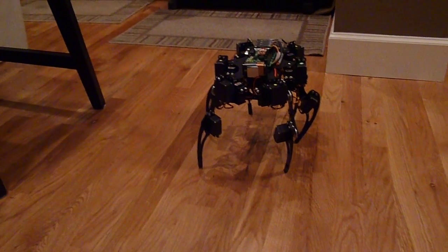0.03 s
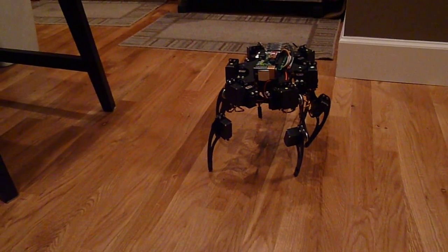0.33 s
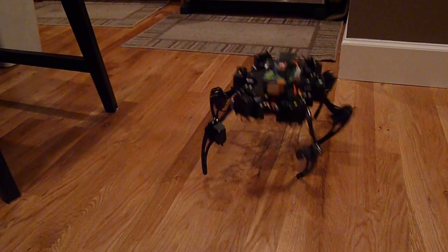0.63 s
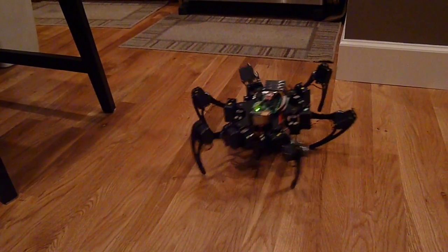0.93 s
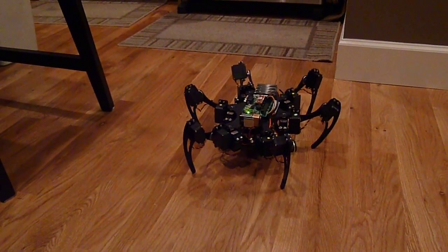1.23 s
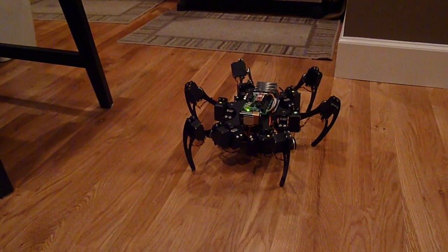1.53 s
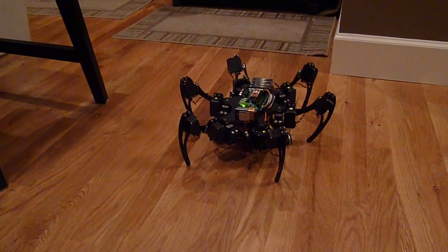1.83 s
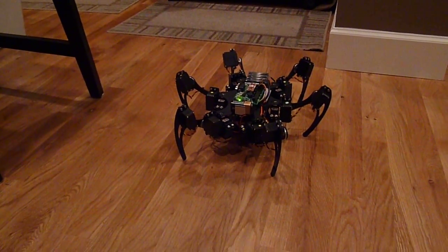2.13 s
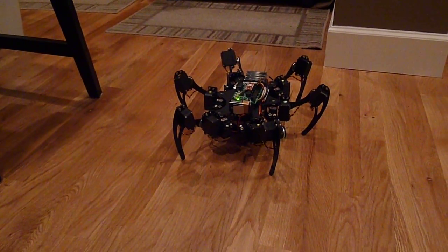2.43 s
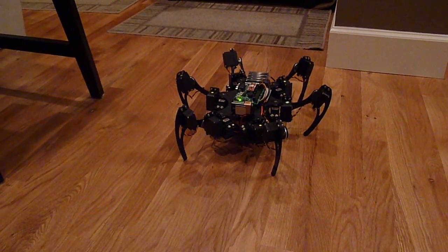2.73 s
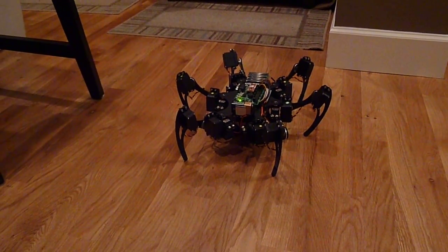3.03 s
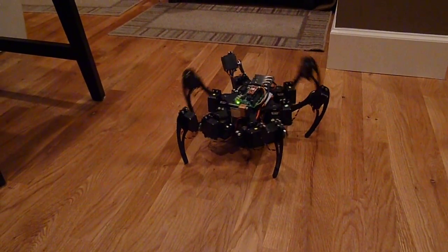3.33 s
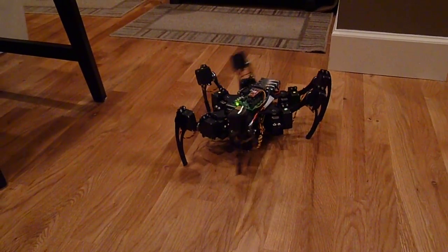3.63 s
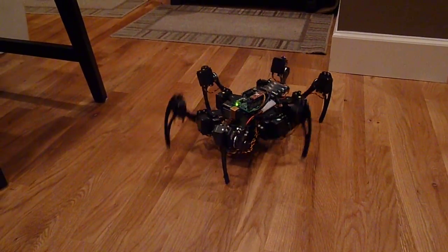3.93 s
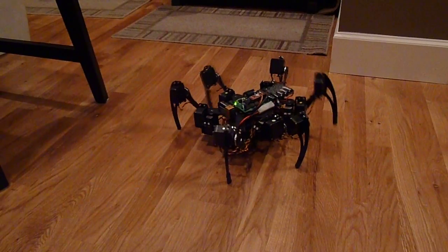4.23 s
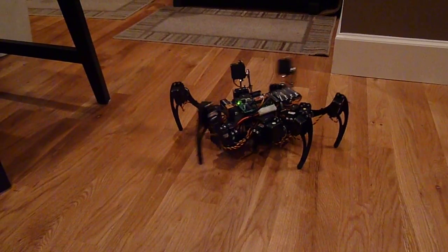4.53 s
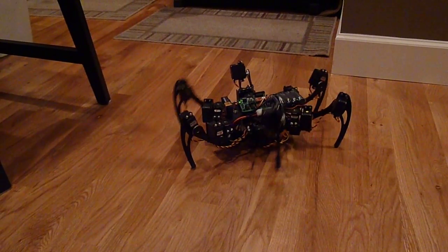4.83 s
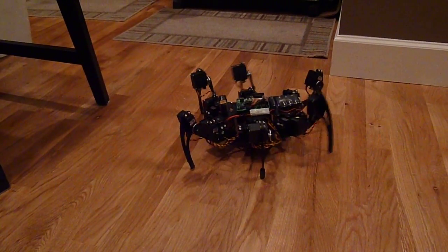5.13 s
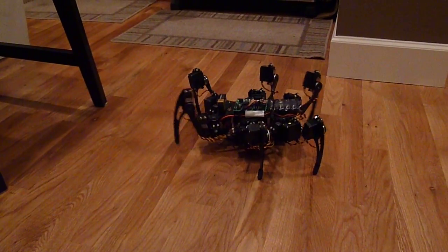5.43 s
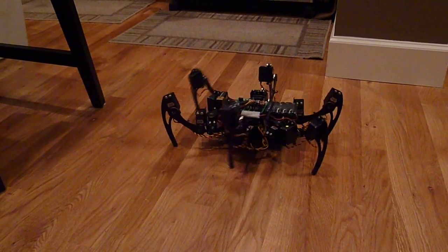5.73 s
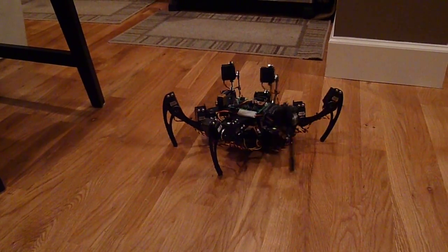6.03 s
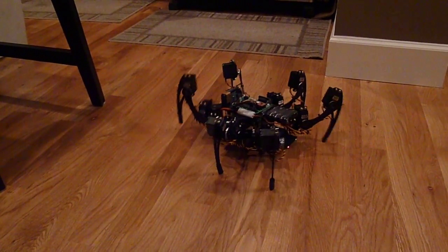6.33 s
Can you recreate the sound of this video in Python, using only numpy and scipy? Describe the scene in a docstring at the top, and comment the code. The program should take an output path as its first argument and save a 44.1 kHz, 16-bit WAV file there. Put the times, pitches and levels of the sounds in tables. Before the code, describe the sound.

A soft room rumble and the faint buzz of a six-legged robot's servos run throughout, heard from nearby with light indoor echo. At the very start there is thin ticking and a brief, soft hollow ring. At about 0.5 seconds the robot crouches: a loud burst of gear rattle with high whines that glide up and down, and dull thumps of feet on wooden boards, dying away by 1.3 seconds. It then stands buzzing quietly, with faint ticking from about 1.5 seconds. Just after 3 seconds it starts walking. Each leg swing is a short, bright burst of rattle and whine, about seven a second, over continuous gear noise and soft, low footfalls on the floor. A leg joint snaps once near 3.9 seconds. The walking continues to the end, at about 6.4 seconds.

```python
"""A six-legged robot stands on a wooden floor in a softly rumbling living room. Its servos, driven by
fifty pulses a second, buzz and tick under its weight, and something hollow rings briefly. It drops into
a crouch: gear teeth rattle the cases and frame, loaded gears whine and the feet thump on the boards.
It stands buzzing for about two seconds, then walks, each leg swing a burst of rattle and whine among
the footfalls. Early in the walk a leg joint snaps once."""
import sys
import numpy as np
from scipy import signal
from scipy.fft import rfft, irfft, next_fast_len
from scipy.io import wavfile
from scipy.ndimage import uniform_filter1d

SR = 44100
rng = np.random.default_rng(int(sys.argv[2]) if len(sys.argv) > 2 else 0)


def wrap_up_sound(samples):
    """Save the sound to the file named by the first command line argument, as 16-bit audio."""
    columns = np.atleast_2d(samples).T
    # keep every value between -1 and 1, then stretch to whole-number steps
    tamed = np.clip(columns, -1, 1)
    steps = np.round(tamed * 32767).astype(np.int16)
    wavfile.write(sys.argv[1], SR, steps)


N = 281799
T = np.arange(N) / SR
DRIVE_HZ = 50   # servo drive pulses


def from_db(db):
    """Amplitude ratio of a level in decibels."""
    return 10 ** (np.asarray(db) / 20)


def unit_rms(x):
    """Normalisation to unit power."""
    return x / np.sqrt(np.mean(x ** 2) + 1e-20)


def coloured(x, spectrum):
    """Spectral shaping by rows (f/Hz, level/dB), falling 100 dB per octave past the ends; unit rms."""
    hz, db = np.transpose(spectrum)
    size = next_fast_len(N)
    octave = np.log2(np.maximum(np.fft.rfftfreq(size, 1 / SR), 1))
    outside = np.abs(octave - np.clip(octave, np.log2(hz[0]), np.log2(hz[-1])))
    gain = from_db(np.interp(octave, np.log2(hz), db) - 100 * outside)
    return unit_rms(irfft(rfft(x, size) * gain, size)[:N])


def drift(cutoff_hz, size=N):
    """Random fluctuation: low-passed Gaussian noise of about unit rms."""
    r = np.exp(-2 * np.pi * cutoff_hz / SR)
    smooth = signal.lfilter([1], [1, -2 * r, r * r], rng.standard_normal(size + SR))
    return unit_rms(smooth[SR // 2:])[-size:]


def resonance(x, hz, width_hz):
    """Forced response of a damped oscillator, with unit gain at its peak."""
    r = np.exp(-np.pi * width_hz / SR)
    feedback = [1, -2 * r * np.cos(2 * np.pi * hz / SR), r * r]
    return signal.lfilter(np.array([1, 0, -1]) * (1 - r * r) / 2, feedback, x + 1e-18)


def struck(blows, modes, scatter_db):
    """Modal ringing after blows (t/s, level/dB, f/Hz); a soft contact barely excites modes above its f."""
    at, level_db, contact_hz = np.transpose(blows)
    out = np.zeros(N)
    for k, (hz, mode_db, t60) in enumerate(modes):
        force = from_db(level_db + mode_db + scatter_db * rng.standard_normal(len(at)))
        impulses = np.full(N, 1e-18)
        impulses[(at * SR).astype(int)] = force / np.hypot(1, (hz / contact_hz) ** 2)
        r, w = from_db(-60 / (t60 * SR)), 2 * np.pi * hz / SR
        out += (-1) ** k * signal.lfilter([0, np.sin(w)], [1, -2 * r * np.cos(w), r * r], impulses)
    return out


# room rumble and hiss: f/Hz, relative spectral level/dB
RUMBLE_SPECTRUM = [(25, -25), (40, -18), (62, -5), (95, -5.5), (150, -9), (205, -3), (290, -7), (350, -8.5),
                   (480, -9.5), (850, -17), (1300, -14), (2200, -24.5), (5000, -29.5), (7600, -33),
                   (8400, -50.5)]
# room hums: f/Hz, waver rate/Hz, level/dB, wavering share of the amplitude
ROOM_HUMS = [(50.6, 1.5, -55.5, 0.62), (214.5, 7.6, -55.5, .9), (241.5, 6.8, -60.5, 0.96),
             (286.7, 15, -59, 0.95), (464, 9, -64, 0.87), (956, 1.7, -69.5, 0.76)]
def room_rumble():
    """Broadband noise plus hums, each a steady tone that wavers by interference with narrowband noise."""
    out = from_db(-49) * coloured(rng.standard_normal(N), RUMBLE_SPECTRUM)
    for hz, waver_hz, db, share in ROOM_HUMS:
        steady = np.sqrt(2 * (1 - share ** 2))
        wavering = share * (drift(waver_hz) + 1j * drift(waver_hz))
        out += from_db(db) * ((steady + wavering) * np.exp(2j * np.pi * hz * T)).real
    return out


# resonances of the servos holding the weight: f/Hz, bandwidth/Hz, relative level/dB
HOLDING_RESONANCES = [(458, 105, -5.5), (756, 110, -4.5), (1118, 195, -3.5), (1395, 164, -7.5)]
def holding_buzz(level_db=-56, scatter_db=4, jitter_s=.00023, hunting_db=3, servos=10):
    """Periodic impulse excitation: each servo is kicked once a drive period; gear play adds jitter."""
    kicks = np.zeros(N)
    for slot in (np.arange(servos) + rng.random(servos)) / servos:
        times = np.arange(slot / DRIVE_HZ, T[-1], 1 / DRIVE_HZ)
        times += jitter_s * rng.standard_normal(len(times))
        at = np.clip(times * SR, 0, N - 1).astype(int)
        kicks[at] += from_db(scatter_db * (rng.standard_normal() + rng.standard_normal(len(at))))
    buzz = sum((-1) ** k * from_db(db) * resonance(kicks, hz, width)
               for k, (hz, width, db) in enumerate(HOLDING_RESONANCES))
    hunting = from_db(hunting_db * drift(15))   # the servos hunt around their set angles
    return from_db(level_db) * unit_rms(buzz * hunting)


def soften_top(x):
    """Low-pass: whines and ticks fade out above 7.4 kHz."""
    return signal.sosfilt(signal.cheby1(10, .5, 7400, fs=SR, output="sos"), x)


# a servo ticking against its load: start t/s, end t/s, f/Hz, bandwidth/Hz, level/dB
STRAIN_SPELLS = [(0.01, 0.47, 5050, 650, -67), (0.01, 0.47, 2300, 300, -71),
                 (1.555, 3.09, 3740, 220, -70.5), (3.099, 3.14, 4440, 2220, -50)]
def strain_ticks(decay_s=.006):
    """Resonant filtering: each drive pulse nudges a motor against its gears; the scratch rings a shell."""
    out = np.zeros(N)
    for start, end, hz, width, db in STRAIN_SPELLS:
        since_pulse = (T - start) % (1 / DRIVE_HZ)
        scratches = rng.standard_normal(N) * np.exp(-since_pulse / decay_s)
        ticks = unit_rms(resonance(resonance(scratches, hz, width), hz, width * 2))
        out += from_db(db) * ticks * ((T > start) & (T < end))
    return soften_top(out)


# soft knocks: t/s, relative level/dB
KNOCKS = [(0.051, -42.5), (0.072, -39.5), (0.118, -40)]
# modes of the hollow body: f/Hz, relative level/dB, T60/s
HOLLOW_MODES = [(276.7, 1, 0.38), (297.3, -5, 0.66), (390, -7, .2), (450, -2, 0.18), (611, -1.5, 0.083),
                (676, -9.5, .4), (709.5, -0.5, 0.32)]
def hollow_ring(contact_hz=1200):
    """Free vibration: something hollow rings on after soft knocks."""
    return from_db(.5) * struck([(t, db, contact_hz) for t, db in KNOCKS], HOLLOW_MODES, scatter_db=1)


def tooth_clicks(per_s, spread_db=2):
    """Poisson impacts: gear teeth clack through their backlash, a few much harder than the rest."""
    sizes = from_db(spread_db * np.minimum(rng.exponential(1, N), 4)) * rng.choice([-1, 1], N)
    return sizes * (rng.random(N) < per_s / SR)


def motor_pulses(effort_db, tooth_hz, speed_exponent, wander=.045, jitter=.008, load_db=7):
    """Harmonic series: four motors pulse once per gear tooth, turning faster with effort; unit rms."""
    speed = from_db(speed_exponent * uniform_filter1d(effort_db - effort_db.max(), size=2000))
    out = np.zeros(N)
    for ratio in np.linspace(.8, 1.2, 4):
        hz = tooth_hz * ratio * speed * (1 + wander * drift(4) + jitter * drift(196.4))
        cycles = np.cumsum(hz) / SR
        motor = sum(np.cos(2 * np.pi * (harmonic * cycles + offset))
                    for harmonic, offset in enumerate(rng.random(11), 1))
        out += motor * from_db(load_db * drift(7.5))   # the load passes from one motor to another
    return out / np.sqrt(uniform_filter1d(out ** 2, size=1500) + 1e-9)


# narrow resonances of the gearbox shells: f/Hz, bandwidth/Hz, gain/dB
SHELL_RESONANCES = [(2705, 110, -4), (3190, 110, -4.5), (3895, 64, -6), (4910, 36, -3.5), (5780, 120, -7),
                    (6680, 220, -7.5), (7950, 140, -12.5), (8010, 170, 0)]
def gear_rattle(motion, gear_spectrum, frame_spectrum, clicks_per_s, tooth_hz, speed_exponent, motor_db,
                pulse_depth, spurt_depth, gear_trim_db, treble_trim_db, frame_trim_db):
    """Forced vibration: motors and loose teeth shake gearboxes and frame, surging on each drive pulse."""
    times, *levels = np.transpose(motion)
    rattle_db, treble_db, frame_db = [np.interp(T, times, level) for level in levels]
    running = uniform_filter1d(1. * ((T > times[0]) & (T < times[-1])), size=200)
    drive_pulse = np.cos(2 * np.pi * DRIVE_HZ * T + .4 * drift(1.6))
    force = unit_rms(tooth_clicks(clicks_per_s))
    force += from_db(motor_db) * motor_pulses(rattle_db, tooth_hz, speed_exponent)
    ringing = sum(from_db(db) * resonance(force, hz, width) for hz, width, db in SHELL_RESONANCES)
    rattle = coloured(force + ringing, gear_spectrum)
    treble, top = [signal.sosfiltfilt(signal.butter(3, hz, "high", fs=SR, output="sos"), rattle)
                   for hz in (5600, 7300)]
    # the highest treble flickers and surges with each drive pulse
    spurts = spurt_depth * (drive_pulse + 1.6 * drift(130))
    rattle = rattle - treble + from_db(treble_db + treble_trim_db) * (treble + top * spurts)
    gearboxes = from_db(rattle_db + gear_trim_db) * rattle
    frame = from_db(frame_db + frame_trim_db) * coloured(tooth_clicks(per_s=4000), frame_spectrum)
    return running * (1 + pulse_depth * drive_pulse) * (gearboxes + frame)


# the drop, before trims: t/s, rattle level/dB, treble level re rattle/dB, frame level/dB
CROUCH_MOTION = [(0.47, -61, -4, -69), (0.517, -35.5, -13.5, -56), (0.602, -32.5, -1, -49.5),
                 (0.77, -32, -3, -40), (0.862, -33.5, -5.5, -42), (0.95, -40.5, -16, -48),
                 (1.08, -45, -11.5, -52), (1.16, -53.5, -20, -66), (1.27, -68, -7.5, -65)]
# gearbox and frame responses in the crouch: f/Hz, relative spectral level/dB
CROUCH_GEAR_SPECTRUM = [(880, -52), (1500, -30), (1700, -5), (2610, -12), (3010, -4.5), (3240, -6),
                        (3710, -2.5), (5640, 1.5), (6130, -2), (6810, 0), (7850, -11), (8330, -17),
                        (8980, -38), (11700, -82), (19800, -120)]
CROUCH_FRAME_SPECTRUM = [(150, 3.5), (300, -2.5), (600, -2.5), (900, -2), (1400, -1), (1900, -7.5),
                         (2600, -10), (4000, -37)]
def crouch_rattle():
    """Structure-borne sound of all legs folding at once."""
    return gear_rattle(CROUCH_MOTION, CROUCH_GEAR_SPECTRUM, CROUCH_FRAME_SPECTRUM, clicks_per_s=7000,
                       tooth_hz=1150, speed_exponent=.18, motor_db=-7.5, pulse_depth=.05,
                       spurt_depth=.24, gear_trim_db=-1.5, treble_trim_db=2.5, frame_trim_db=-2.5)


def gear_whine(track, wobble, mesh_db, third_db, roughness=.45, fade_s=.0083):
    """Gear-mesh tone, strongest at twice the mesh rate; uneven teeth modulate its pitch and amplitude."""
    times, hz, level_db = np.transpose(track)
    during = (T > times[0]) & (T < times[-1])
    t, out = T[during], np.zeros(N)
    mesh_hz = np.interp(t, times, hz) / 2 * (1 + wobble * drift(250, len(t)))
    phase = 2 * np.pi * np.cumsum(mesh_hz) / SR
    tone = from_db(mesh_db) * np.sin(phase) + np.sin(2 * phase) + from_db(third_db) * np.sin(3 * phase)
    fade = np.minimum(np.minimum(t - times[0], times[-1] - t) / fade_s, 1)
    flutter = 1 + roughness * drift(270, len(t))
    out[during] = from_db(np.interp(t, times, level_db)) * tone * fade * flutter
    return out


# gliding whines in the crouch, one track for each tone: t/s, f/Hz, level/dB
CROUCH_TRACKS = [
    [(0.575, 3850, -37), (0.62, 4516, -32.5), (0.655, 5125, -27.5), (0.685, 4600, -33.5),
     (0.708, 5100, -28), (0.735, 4640, -37.5), (0.81, 3735, -45), (0.89, 3400, -43.5), (0.94, 3005, -49),
     (1.08, 2790, -58)],
    [(0.54, 4950, -34), (0.595, 5960, -42.5), (0.62, 6580, -41), (0.72, 6160, -41.5), (0.762, 6900, -29)],
    [(0.772, 5650, -30), (0.8, 5760, -38), (0.875, 5430, -43)],
    [(0.585, 2170, -43), (0.665, 2400, -43.5), (0.81, 2050, -48)],
]
def crouch_whines():
    """Mesh frequency follows shaft speed: the tones glide as the servos speed up and run down."""
    return soften_top(sum(gear_whine(track, wobble=.022, mesh_db=-21, third_db=-14.5)
                          for track in CROUCH_TRACKS))


# feet landing: t/s, relative level/dB, contact cutoff f/Hz
LANDINGS = [(0.775, -31.5, 55), (0.975, -44.5, 250), (1.16, -37, 45), (3.589, -36.5, 260),
            (3.737, -35, 110), (4.217, -40, 200), (4.502, -35.5, 248.2), (4.66, -33, 55),
            (4.946, -45.5, 250), (5.134, -37.5, 160), (5.424, -32, 300.8), (5.559, -31, 84.5),
            (5.868, -40.5, 200), (6.037, -37.5, 159.6), (6.335, -33, 296.4), (6.37, -46.5, 150)]
# floorboard modes: f/Hz, relative level/dB, T60/s
BOARD_MODES = [(48, -12, 0.41), (57, -7, 0.096), (67.7, -3.5, 0.43), (92.8, 1, 0.25), (96, -6, 0.6),
               (109, -4.5, 0.15), (140.6, -5, 0.26), (179.5, -11, 0.18), (238, -1, 0.25), (270.8, 3, 0.24),
               (315, 0.5, 0.15)]
def footfalls():
    """Impact excitation: each foot sets the low modes of the floorboards ringing."""
    return from_db(-1.5) * struck(LANDINGS, BOARD_MODES, scatter_db=2)


# leg swings, before trims: start t/s, duration/s, rattle level/dB, treble level re rattle/dB,
# shudder level/dB, whine f/Hz, glide/(octaves/s), whine level/dB, slower joint's level/dB
LEG_SWINGS = [(3.171, 0.076, -42.5, -12, -52, 4200, 1.5, -47, -44),
              (3.278, 0.13, -36.5, -7, -49.5, 5300, 1, -46, -45),
              (3.458, 0.077, -40, -17, -55, 5100, .5, -48, -43.5),
              (3.622, .085, -34, -6, -52.5, 5376, -.7, -33.5, -34),
              (3.785, 0.097, -36, -4.5, -52.5, 4620, 2.5, -36, -50),
              (3.922, 0.087, -37.5, -3.5, -49.5, 4990, 1.2, -37, -48),
              (4.077, 0.094, -34, -3.5, -51.5, 6110, .5, -34.5, -44),
              (4.25, .085, -37, -0.5, -49.5, 5380, 1.4, -35.5, -43),
              (4.379, 0.094, -36.5, -6.5, -51.5, 4150, -0.7, -37, -47.5),
              (4.555, 0.08, -36.5, -8, -55.5, 4620, -1, -39, -48),
              (4.699, 0.076, -35.5, -9, -59, 4500, -1.3, -36, -50),
              (4.855, 0.085, -35.5, -4, -49, 5050, .8, -40, -47),
              (5.006, 0.075, -33.5, -3.5, -48.5, 5330, 1.5, -36, -44),
              (5.146, .1, -37, -4.5, -47.5, 5467, 1.5, -36, -50),
              (5.313, 0.08, -37, -10.5, -46.5, 5094, 1.2, -40.5, -46.5),
              (5.461, 0.098, -37, -9, -52, 5550, 0.8, -41, -43),
              (5.606, .1, -37, -4.5, -62, 4630, -.5, -37, -49),
              (5.742, 0.11, -37.5, -3, -48.5, 4980, .7, -37, -50),
              (5.897, .11, -34, -5, -48.5, 4973, 1.2, -34, -41),
              (6.068, 0.081, -34.5, -4.5, -50, 5200, .8, -38, -46),
              (6.203, 0.16, -36.5, -23.5, -48, 5030, -.4, -41, -48)]
def walk_motion(attack_s=.022, release_s=.022, brake_lag_s=.024, brake_spread_s=.021):
    """Incoherent sources add in power: swings over the standing legs' push, as rows for gear_rattle."""
    start_s, build_s = 3.12, .15
    t = T[T >= start_s][::40]
    push_db = -40 - 5 * np.exp(-(t - start_s) / build_s)   # the standing legs take up the push gradually
    rattle, treble, frame = [from_db(push_db + db) ** 2 for db in (0, -3, -15)]
    for start, length, rattle_db, treble_db, shudder_db, *_ in LEG_SWINGS:
        since_end = t - start - length
        spin_up = np.clip((t - start) / attack_s, 0, 1)
        coast = np.exp(-np.maximum(since_end, 0) / release_s)
        rattle += (spin_up * coast * from_db(rattle_db)) ** 2
        treble += (spin_up * coast * from_db(rattle_db + treble_db)) ** 2
        braking = np.exp(-((since_end - brake_lag_s) / brake_spread_s) ** 2)
        frame += from_db(shudder_db) ** 2 * braking
    levels_db = 10 * np.log10([rattle, treble / rattle, frame])
    return np.column_stack([t, *levels_db])


# gearbox and frame responses in the walk: f/Hz, relative spectral level/dB
WALK_GEAR_SPECTRUM = [(1180, -45), (2000, -37.5), (2100, -10.5), (3140, -4), (3500, -3), (3940, 1),
                      (5130, 3.5), (6810, -7), (8070, -22.5), (8430, -28), (8980, -47.5), (11700, -81),
                      (19800, -120)]
WALK_FRAME_SPECTRUM = [(200, -1.5), (450, -7.5), (700, -8), (950, -7.5), (1250, -0.5), (1550, -8),
                       (1830, 0.5), (2100, -10), (3000, -23)]
def walk_rattle():
    """Structure-borne sound of the gait: gears rattle in each swing and the frame shudders on braking."""
    return gear_rattle(walk_motion(), WALK_GEAR_SPECTRUM, WALK_FRAME_SPECTRUM, clicks_per_s=9000,
                       tooth_hz=900, speed_exponent=.2, motor_db=-7, pulse_depth=.097,
                       spurt_depth=.2, gear_trim_db=-2, treble_trim_db=6.5, frame_trim_db=2.5)


def swing_whines(slow_ratio=.77, motor_hz=2954, motor_re_rattle_db=-11.5, crest=.6, edge_db=-8):
    """Superposed mesh tones: two joints and a motor swell and glide together through each swing."""
    out = np.zeros(N)
    for start, length, rattle_db, _, _, whine_hz, glide, whine_db, slow_db in LEG_SWINGS:
        voices = [(whine_hz, whine_db), (whine_hz * slow_ratio, slow_db),
                  (motor_hz, rattle_db + motor_re_rattle_db)]
        for hz, db in voices:
            track = [(start + share * length, hz * 2 ** (glide * (share - crest) * length), db + swell_db)
                     for share, swell_db in ((0, edge_db), (crest, 0), (1, edge_db))]
            out += gear_whine(track, wobble=.0242, mesh_db=-20.5, third_db=-18)
    return soften_top(out)


# a leg joint snapping: t/s, relative level/dB
JOINT_SNAPS = [(3.878, -30)]
# modes of the joint: f/Hz, relative level/dB, T60/s
JOINT_MODES = [(1111, 3, 0.036), (1340, 1.5, 0.032), (1580, -0.5, 0.055), (3182, -1, 0.017)]
def joint_snap(contact_hz=4000):
    """Impulse response: a hard contact excites the joint's high, heavily damped modes."""
    blows = [(t, db, contact_hz) for t, db in JOINT_SNAPS]
    return from_db(-3.5) * struck(blows, JOINT_MODES, scatter_db=4)


def reverberation(x, t60_s=.63, paths=10):
    """Repeated reflection between walls: feedback delays diffused by allpasses; about unit gain."""
    size = next_fast_len(N + SR)
    delay_exponent = -2j * np.pi * np.arange(size // 2 + 1) / size
    response = 0
    for k, lag_s in enumerate(rng.uniform(.011, .047, paths)):
        echo = from_db(-60 * lag_s / t60_s) * np.exp(delay_exponent * int(lag_s * SR))
        response += (-1) ** k * echo / (1 - echo)
    for lag_samples in (67, 163, 251):
        delay = np.exp(delay_exponent * lag_samples)
        response *= (delay - .5) / (1 - .5 * delay)
    response /= np.sqrt(np.mean(np.abs(response) ** 2))
    return irfft(rfft(x, size) * response, size)[:N]


def scene():
    """Superposition of the robot's direct sound, its reverberant field and the room's rumble."""
    rattle = crouch_rattle() + walk_rattle()
    whines = crouch_whines() + swing_whines()
    steps = footfalls()
    small_sounds = joint_snap() + hollow_ring() + holding_buzz() + strain_ticks()
    direct = rattle + whines + small_sounds + steps
    to_walls = from_db(-6.5) * rattle + from_db(-9) * (whines + small_sounds) + from_db(-4.5) * steps
    return (direct + reverberation(to_walls) + room_rumble())[None]


def record(dry, cutoff_hz=9000, offset=.0164):
    """Band limiting: a steep low-pass cuts the top, and a constant offset shifts the signal off zero."""
    return signal.sosfilt(signal.ellip(12, .1, 80, cutoff_hz, fs=SR, output="sos"), dry) + offset


dry = scene()
out = record(dry)
wrap_up_sound(out)
```